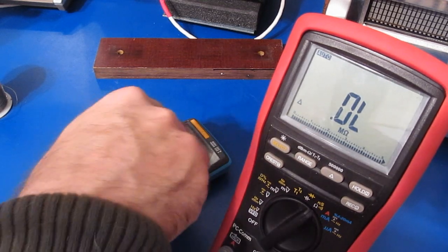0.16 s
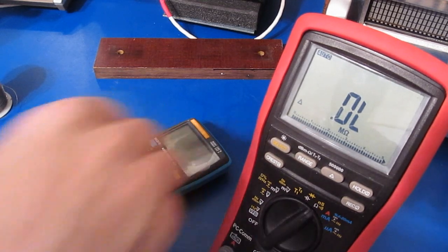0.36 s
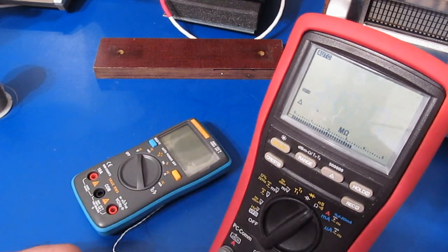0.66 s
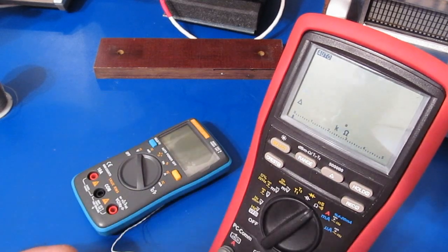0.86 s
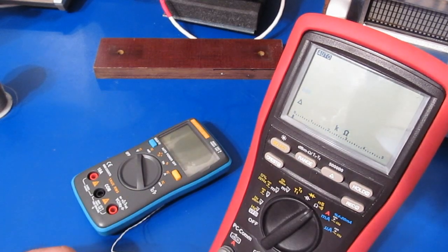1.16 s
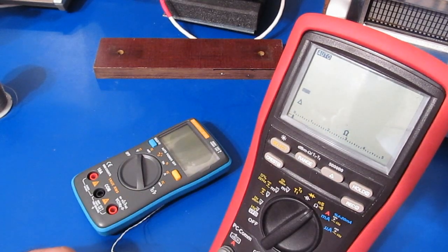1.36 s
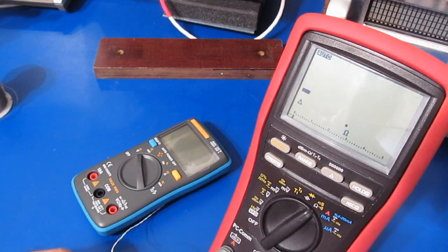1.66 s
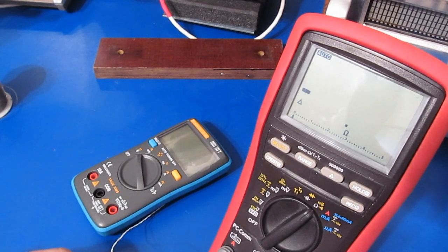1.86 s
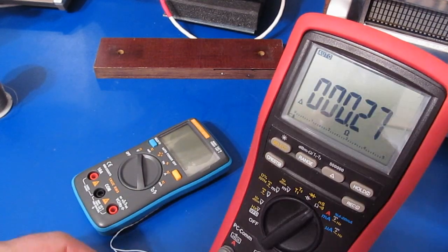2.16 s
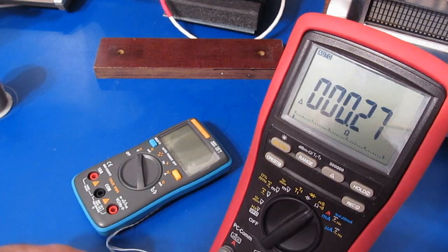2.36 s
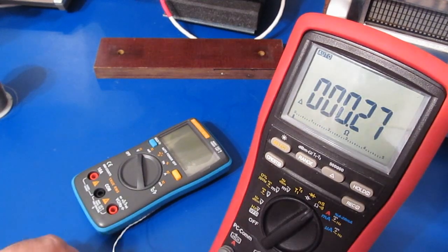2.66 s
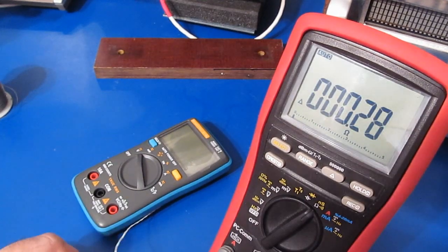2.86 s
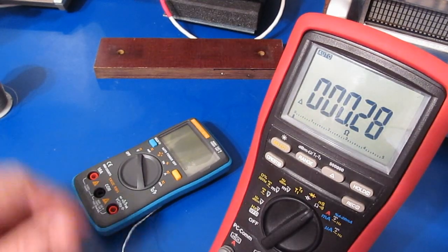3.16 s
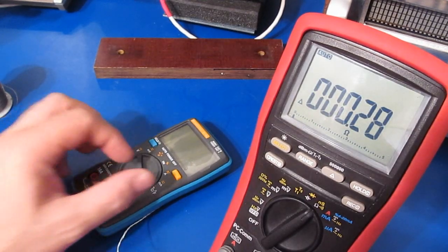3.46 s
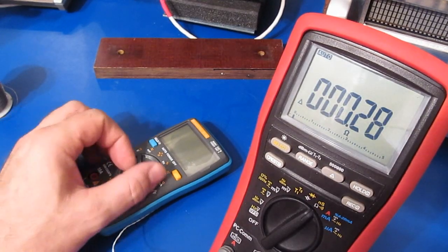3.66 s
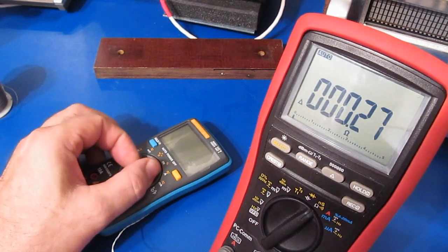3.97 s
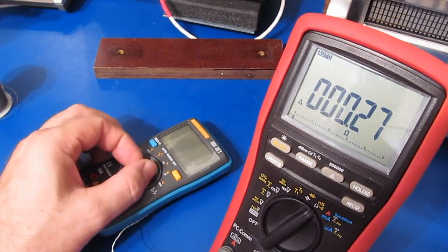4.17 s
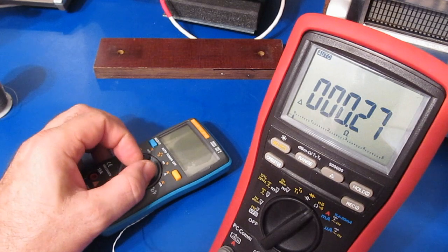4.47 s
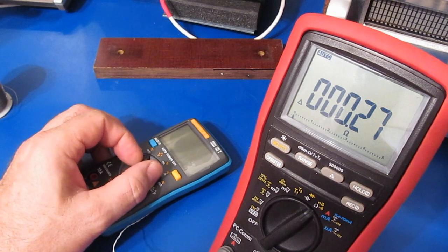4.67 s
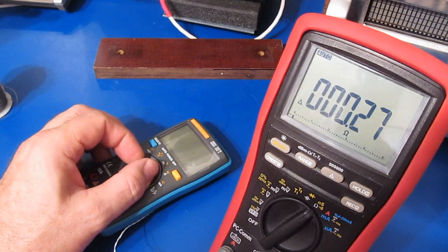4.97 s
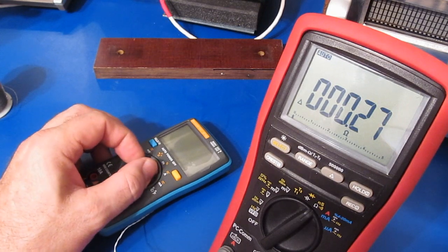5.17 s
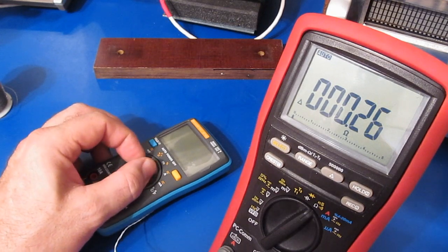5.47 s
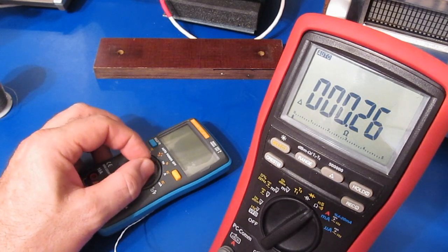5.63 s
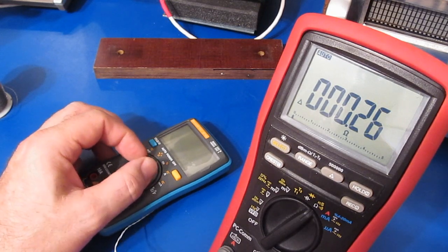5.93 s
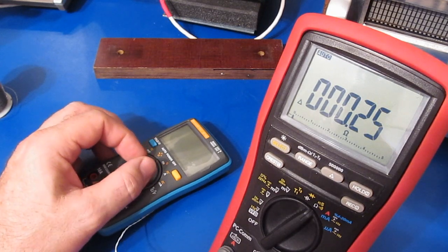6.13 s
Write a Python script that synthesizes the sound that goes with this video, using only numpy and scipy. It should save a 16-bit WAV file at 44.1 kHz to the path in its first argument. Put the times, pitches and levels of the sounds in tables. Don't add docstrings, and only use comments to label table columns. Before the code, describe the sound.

Over a low steady bed of fan air, hum and slight hiss, a small dial clicks with a short rubbing lead-in and rattle. Cloth brushes and faint ticks lead to a busy burst of knocks on the bench. After quieter handling, the dial snaps brightly, rests, then snaps once more. Everything is close and dry, with short bench echoes and a quick small-room tail.

```python
import sys
import numpy as np
from scipy import signal
from scipy.fft import rfft, irfft
from scipy.io import wavfile
from scipy.ndimage import uniform_filter1d

SR = 44100
rng = np.random.default_rng(int(sys.argv[2]) if len(sys.argv) > 2 else 0)


def invert_db(level):
    return 10 ** (np.asarray(level, dtype=float) / 20)


def transcribe(signal):
    frames = np.atleast_2d(signal).T
    limited = np.clip(frames, -1, 1)
    pcm = np.round(limited * 32767).astype(np.int16)
    wavfile.write(sys.argv[1], SR, pcm)


N = 277830
T = np.arange(N) / SR
HZ = np.maximum(np.fft.rfftfreq(N, 1 / SR), 1)


def rms_one(x):
    return x / np.sqrt(np.mean(x ** 2) + 1e-20)


def at_hz(points, hz):
    table = np.array(points)
    return np.interp(np.log(hz), np.log(table[:, 0]), table[:, 1])


def filtered(x, order, hz, kind="low"):
    return signal.sosfilt(signal.butter(order, hz, kind, fs=SR, output="sos"), x)


def ring(force, hz, t60_s):
    radius = invert_db(-60 / (t60_s * SR))
    turn = 2 * np.pi * hz / SR
    return signal.lfilter([0, np.sin(turn)], [1, -2 * radius * np.cos(turn), radius ** 2], force + 1e-18)


def add(out, sound, start_s):
    i = max(round(start_s * SR), 0)
    out[..., i:i + sound.shape[-1]] += sound[..., :N - i]


def grains(spread_db, share, size):
    happens, sign, strength = rng.random((3, size))
    return (happens < share) * np.sign(sign - .5) * invert_db(-spread_db * np.log(1 - strength))


def rattle(t60_s, t, share=.15):
    force = grains(2.5, share, size=len(t)) * invert_db(-60 * t / t60_s)
    force[0] = 4.2
    return force


def swell(t, rise_s, fall_s):
    return np.where(t < 0, np.exp(-.5 * (t / rise_s) ** 2), np.exp(-np.maximum(t, 0) / fall_s))


def coloured(spectrum, likeness):
    mid, side = rfft(rng.standard_normal((2, N))) * invert_db(at_hz(spectrum, HZ))
    mid = mid * np.sqrt(1 + likeness)
    side = side * np.sqrt(1 - likeness)
    return rms_one(irfft([mid + side, mid - side], N))


def off_centre(mono):
    return np.array([mono, np.roll(mono, 2)])


# frequency in Hz, level in dB per Hz.
AIR_SPECTRUM = [(12, -15.5), (26, 3), (42, -8.5), (60, -1), (85, -10.5), (125, -4), (175, -8), (240, -9),
                (330, -14.5), (800, -17.5), (1150, -17), (1900, -22), (4000, -30.5), (9000, -43.5)]
# frequency in Hz, left-right likeness from -1 to 1.
AIR_LIKENESS = [(60, 0.3), (180, 0.81), (550, 0.55), (1650, 0.039), (4970, 0.12), (15000, -0.03)]
AIR_DB = -49.5


def air():
    return invert_db(AIR_DB - 1.0) * coloured(AIR_SPECTRUM, np.clip(at_hz(AIR_LIKENESS, HZ), 0, .99))


# frequency in Hz, level in dB per Hz.
HISS_SPECTRUM = [(1000, -13.5), (4000, 2), (8000, -1), (13000, -15), (14100, -5), (15000, -42),
                 (16000, -42)]
HISS_DB = -67.5


def hiss():
    return invert_db(HISS_DB) * coloured(HISS_SPECTRUM, 0)


# frequency in Hz, level in dB rms.
HUM_TONES = [(59.2, -64.5), (118.4, -62), (236.9, -62.5), (360.7, -70), (419.9, -63.5), (479.1, -68.5),
             (839.8, -71.5), (1200, -72.0), (13916, -96.0), (14040, -97.5), (14277, -88.0)]
# time in seconds, whine in Hz.
FAN_WHINE = [(0, 1240), (1.4, 1237.5), (2.9, 1241), (3.8, 1239.5), (4.5, 1243), (5.3, 1240), (6.3, 1241.5)]
# frequency as a share of the whine, level in dB rms.
FAN_TONES = [(0.7517, -74.5), (.874, -62), (1, -61), (1.373, -74.5)]


def hum():
    whine_cycles = np.cumsum(np.interp(T, *np.transpose(FAN_WHINE))) / SR
    tones = [(hz * T, db) for hz, db in HUM_TONES]
    tones += [(share * whine_cycles, db) for share, db in FAN_TONES]
    knots_s = np.linspace(0, T[-1], 60)
    out = np.zeros((2, N))
    for cycles, db in tones:
        wander, waver = [np.interp(T, knots_s, k) for k in rng.standard_normal((2, 60))]
        phase = 2 * np.pi * cycles + 0.31 * wander + rng.uniform(0, 6.36)
        phase = phase + rng.normal(0, 0.32) * np.array([[1], [-1]])
        out += np.sqrt(2) * invert_db(db + 1.3 * waver) * np.sin(phase)
    return out


# time in seconds, level in dB.
STIR = [(0.0, -68.5), (0.28, -44.5), (0.44, -63), (0.61, -63.5), (0.82, -55.5), (1.04, -61.5), (1.83, -100),
        (2.01, -66), (2.54, -55), (2.62, -74), (2.92, -60), (4.23, -74), (4.4, -82)]
# peak in seconds, level in dB, fall in seconds.
BRUSHES = [(0.125, -46.5, 0.012), (.48, -56, 0.017), (.635, -53.5, 0.062), (.775, -51, 0.03),
           (1.235, -48, 0.026), (1.285, -49.5, 0.029), (1.339, -49, 0.034), (1.408, -49.5, 0.03),
           (2.090, -45.5, 0.028), (2.645, -49.5, 0.024), (3.649, -51, 0.038), (3.78, -51.5, 0.11),
           (3.865, -52, 0.0067), (4.262, -44, 0.026)]
# peak in seconds, level in dB, rise in seconds.
DRAGS = [
    (.76, -57, .019),
    (.89, -57, 0.033),
    (2.225, -58, 0.064),
    (2.608, -45.5, 0.03),
    (3.319, -54.5, 0.024),
]
# frequency in Hz, level in dB per Hz.
CLOTH_SPECTRUM = [(150, 8), (600, 2), (1500, -1.5), (3000, -0.5), (4600, -5), (5500, -2.5), (6000, -8),
                  (6800, -7), (8000, -13.5), (9500, -12), (12000, -21), (15000, -33.5)]
# frequency in Hz, left-right likeness.
CLOTH_LIKENESS = [(500, .85), (2500, .6), (6000, .15), (9000, .05)]
BRUSH_RISE_SHARE, DRAG_STOP_S = 0.21, 0.013


def sleeve():
    level = invert_db(np.interp(T, *np.transpose(STIR), right=-90))
    for s, db, fall_s in BRUSHES:
        level = level + invert_db(db) * swell(T - s, BRUSH_RISE_SHARE * fall_s, fall_s)
    for s, db, rise_s in DRAGS:
        level = level + invert_db(db) * swell(T - s, rise_s, DRAG_STOP_S)
    catch = uniform_filter1d(abs(grains(2.5, .004, size=N)), size=60)
    return coloured(CLOTH_SPECTRUM, at_hz(CLOTH_LIKENESS, HZ)) * level * (1 + .22 * rms_one(catch))


# frequency in Hz, level in dB at the first, second and third detent,
# level in dB when rubbed.
CASE_MODES = [(563, -26.5, -36.5, -31, -15), (734, -19, -13.5, -8, -8), (978, -13, -7.5, -28, -11.5),
              (1319, -8.5, 3.5, -4.5, -6), (1657, -4, -5.5, -13, -5.5), (2082, -7, -10.5, -13, 1),
              (2527, -7, 6, -4, -1), (2815, 5.5, 4, -14, 1.5), (3340, -1, 5.5, -6.5, 0),
              (3930, 4.5, -1, -3, 0.5), (4600, -1, 8, 8, -0.5), (5240, 9.5, 7.5, 9, -0.5),
              (5505, 10, 15, 16, -36), (5896, 8.5, 13, 6.5, -9), (7250, -18, -0.5, -6, -25.5),
              (7140, -17, -1, -15, -57), (7270, 3, 11.5, 8, 3.5), (8630, 11, 18, 10.5, -1),
              (9400, 9.5, 14, 8, -26.5), (10800, 4.5, 5.5, 7, -1), (10260, -35, 3, -20, -24.5),
              (12300, -12, 9.5, -24, -19.5), (14900, -42, -1, -23, -46)]
# frequency in Hz, left minus right in dB.
SHADOW = [(500, -1.5), (2500, -.3), (5000, 1.5), (9000, 4.5)]
CASE_T60_S, DAMPING = .03, 1.2


def case(force, levels_db):
    out = np.zeros((2, len(force)))
    for k, (mode, db) in enumerate(zip(CASE_MODES, levels_db)):
        hz = mode[0]
        sound = ring(force, hz, CASE_T60_S * (1000 / hz) ** DAMPING) * invert_db(db) * (-1) ** k
        pan_db = at_hz(SHADOW, hz) / 2
        lag = 1 + (hz < 5500)
        out += [sound * invert_db(pan_db), np.roll(sound, lag) * invert_db(-pan_db)]
    return out


# peak in seconds, level in dB, fall in seconds,
# brightness in dB per octave.
RUBS = [(.025, -50, 0.021, -7), (0.2124, -31, 0.0056, -1.5), (.2185, -33, .005, 1.5),
        (.245, -44, 0.026, -1), (.272, -38, 0.01, -1.5), (.305, -45, 0.018, -9), (.361, -42, 0.013, -1.5),
        (.768, -45.5, 0.027, -3.5), (3.622, -44.5, 0.0093, -3.5), (3.650, -46, 0.013, -2.2),
        (4.081, -30, 0.009, -2.5), (5.590, -39, 0.0077, -1.3)]
RUB_RISE_SHARE, RUB_LEAD_S = .62, .05


def rubs():
    out, t, modes = np.zeros((2, N)), T[:8000] - RUB_LEAD_S, np.array(CASE_MODES)
    for s, db, fall_s, tilt_db in RUBS:
        slips = grains(2.9, 0.18, size=len(t))
        levels_db = modes[:, 4] + tilt_db * np.log2(modes[:, 0] / 1000)
        steady = np.std(case(slips, levels_db))
        stroke = slips * swell(t, RUB_RISE_SHARE * fall_s, fall_s)
        sound = invert_db(db) / steady * case(stroke, levels_db)
        cut = max(round((RUB_LEAD_S - s) * SR), 0)
        add(out, sound[:, cut:], s - RUB_LEAD_S)
    return out


# start in seconds, level in dB, frequency in
# Hz, t60 in seconds.
PINGS = [(.3585, -23.5, 710, 0.019), (.3585, -32, 3010, 0.02), (0.75, -42.5, 1253, 0.28),
         (.2105, -27, 2720, .03), (.214, -25, 693, .03), (2.435, -41, 2360, 0.089), (2.438, -41, 2560, .09),
         (2.611, -50, 2196, .12), (2.662, -43, 1692, .069), (2.763, -47, 5240, .025),
         (3.314, -49, 5244, .06), (3.313, -49, 7600, .03), (3.618, -38, 720, .04),
         (3.619, -36.5, 1400, 0.038), (3.646, -34, 1370, 0.045), (3.655, -42, 1410, .035),
         (3.098, -52, 5180, .02), (3.197, -50, 5200, .02), (3.844, -39.5, 663, 0.044),
         (3.943, -36.5, 736, 0.025), (3.957, -36, 710, 0.025), (3.986, -44, 720, 0.048),
         (4.022, -36.5, 716, 0.035), (3.785, -46, 1700, 0.056), (4.033, -55.5, 2900, 0.087)]
PING_BUILD_S = .003


def pings():
    out, t = np.zeros(N), T[:6000]
    push = (t < PING_BUILD_S) * 2 / (PING_BUILD_S * SR)
    for s, db, hz, t60_s in PINGS:
        add(out, invert_db(db) * ring(push * np.sin(2 * np.pi * hz * t), hz, t60_s), s)
    return off_centre(out)


# start in seconds, level in dB, rattle t60 in seconds,
# dull knock in dB, sharpness of contact as its upper limit in Hz.
DETENTS = [
    (.2250, -15.5, 0.028, -40, 10500),
    (4.1114, -13, 0.016, -27.5, 15500),
    (5.6457, -17, 0.013, -21, 11300),
]
KNOCK_HZ, KNOCK_T60_S, KNOCK_AHEAD_S = 1370, 0.012, .0025
SPIT_DB, SPIT_HZ, SPIT_T60_S = -9.5, 4000, .012


def detents():
    direct, radiated, t, modes = np.zeros((2, N)), np.zeros((2, N)), T[:4000], np.array(CASE_MODES)
    click = 1. * (t == 0)
    for k, (s, db, rattle_s, knock_db, sharp_hz) in enumerate(DETENTS):
        contact_hz = min(sharp_hz, .45 * SR)
        levels_db = modes[:, 1 + k]
        snap = case(filtered(rattle(rattle_s, t, .2), 4, contact_hz), levels_db)
        snap *= invert_db(db) / np.sqrt(np.mean(snap[:, :130] ** 2))
        spit = grains(2.5, 0.78, size=len(t)) * invert_db(-60 * t / SPIT_T60_S)
        spit = filtered(filtered(spit, 2, SPIT_HZ, "high"), 4, contact_hz)
        spit *= invert_db(db + SPIT_DB) / abs(spit).max()
        add(direct, snap + spit * invert_db([[1.5], [-1.5]]), s)
        even = case(filtered(click, 4, contact_hz), uniform_filter1d(levels_db, size=3))
        add(radiated, rms_one(even) * np.std(snap), s)
        add(direct, invert_db(knock_db) * ring(click, KNOCK_HZ, KNOCK_T60_S), s - KNOCK_AHEAD_S)
    return direct, radiated


# start in seconds, peak in dB, pitch in Hz.
TAPS = [(.2260, -30.5, 584), (0.7484, -27, 1050), (0.752, -35, 2100), (0.767, -34, 2100), (.753, -40, 480),
        (0.861, -43.5, 506), (2.1180, -38, 2520), (2.169, -26, 3450), (2.3531, -22.5, 3620),
        (2.4303, -9.5, 3850), (2.5510, -28, 4570), (2.5748, -27, 3220), (2.592, -35, 1540),
        (2.6050, -46, 5100), (2.6320, -28, 5000), (2.8111, -22, 2120), (2.815, -28.5, 815),
        (2.8133, -24.5, 3820), (2.8230, -32, 2700), (2.9218, -28.5, 2200), (2.9215, -36, 3870),
        (2.9250, -34, 840), (3.191, -33.5, 1490), (3.1915, -42, 3300), (3.3137, -33, 5400),
        (3.7585, -41, 2170), (3.8100, -30.5, 2780), (4.111, -40, 466), (5.644, -48, 450)]
# start in seconds, peak in dB, pitch in Hz.
TICKS = [(2.0620, -43, 3000), (2.4205, -16.5, 3700), (2.4359, -27, 2470), (2.4800, -27, 3040),
         (2.6635, -43, 5030), (2.704, -42, 3800), (2.7190, -44, 1780), (3.108, -40.5, 3040),
         (3.265, -42.5, 2540), (3.618, -41, 4000), (3.871, -36, 1510)]
# frequency as a share of the pitch, level in dB, cycles to die.
TAP_MODES = [(.48, 15.5, 2.38), (.74, 13.5, 4.84), (1, 7.5, 8), (1.37, 3, 8.9), (1.75, 1, 3.9)]
RATTLE_CYCLES, RATTLE_LONGEST_S, TICK_S = 60, 0.16, 0.009
TAP_TOP_HZ, TAP_TOP_SHARE = 6400, 1.67
TAP_FOOT_SHARE = .3


def taps():
    out, t = np.zeros(N), T[:6000]
    touches = [(s, db, hz, min(RATTLE_CYCLES / hz, RATTLE_LONGEST_S)) for s, db, hz in TAPS]
    touches += [(*row, TICK_S) for row in TICKS]
    for s, db, hz, t60_s in touches:
        force = rattle(t60_s, t)
        body = np.zeros(len(t))
        for k, (ratio, mode_db, cycles) in enumerate(TAP_MODES):
            body += invert_db(mode_db) * ring(force, hz * ratio, cycles / hz) * (-1) ** k
        body = filtered(body, 4, max(TAP_TOP_SHARE * hz, TAP_TOP_HZ))
        body = filtered(body, 2, TAP_FOOT_SHARE * hz, "high")
        add(out, invert_db(db) * body / abs(body).max(), s)
    return off_centre(out)


# start in seconds, level in dB.
THUDS = [(0.227, -33.5), (0.747, -64), (.861, -40.5), (2.4205, -26), (2.4365, -35), (2.479, -37),
         (2.5917, -50), (2.719, -44.5), (2.8104, -43), (2.821, -50), (2.9202, -43.5), (3.108, -42),
         (3.192, -43.5), (3.266, -43.5), (3.62, -42), (3.872, -33.5), (4.111, -40.5), (5.643, -43)]
# frequency in Hz, t60 in seconds, level in dB.
BENCH_MODES = [
    (114.8, 0.11, -5.5),
    (194, 0.041, 2.5),
    (296, 0.017, 4),
]


def thuds():
    out = np.zeros(N)
    blow = np.pad(np.hanning(70) / 35, (0, 6000 - 70))
    thud = sum(invert_db(db) * ring(blow, hz, t60_s) for hz, t60_s, db in BENCH_MODES)
    thud = filtered(thud, 2, 95, "high")
    for s, db in THUDS:
        add(out, invert_db(db) * thud, s)
    return off_centre(out)


# start in seconds, peak in dB.
CRACKS = [
    (1.719, -40),
    (1.7245, -36),
    (2.4205, -27),
    (2.4305, -20.5),
    (2.551, -43),
    (2.632, -32),
    (2.8116, -35.5),
    (3.3126, -30.5),
    (3.785, -50),
]
CRACK_S = .018


def cracks():
    out, t = np.zeros(N), T[:6000]
    for s, db in CRACKS:
        crack = filtered(rattle(CRACK_S, t), 3, [6500, 12500], "band")
        add(out, invert_db(db) * crack / abs(crack).max(), s)
    return off_centre(out)


# frequency in Hz, t60 in seconds.
ROOM_T60 = [(300, 0.16), (1500, 0.23), (4000, 0.2), (9000, 0.17), (11500, 0.14), (14000, 0.055)]
ROOM_DB, BENCH_ECHO_DB, BENCH_ECHO_T60_S = -1.5, 3.5, 0.036


def room(x):
    t, edges_hz = T[:SR // 2], 200 * 2 ** np.arange(0, 6.5, .25)
    shared, *own = rng.standard_normal((3, len(t)))
    white = .7 * shared + .7 * np.array(own)
    early = invert_db(BENCH_ECHO_DB - 60 * t / BENCH_ECHO_T60_S) * (t > .0015)
    reply = 0
    for low, high in zip(edges_hz, edges_hz[1:]):
        band = filtered(white, 2, [low, high], "band")
        t60_s = at_hz(ROOM_T60, np.sqrt(low * high))
        late = invert_db(ROOM_DB - 60 * t / t60_s) * (1 - np.exp(-t / 0.004))
        reply = reply + band * (late + early) * 0.039
    return signal.fftconvolve(x, reply, axes=1)[:, :N]


def scene():
    left, right = air() + hum() + sleeve()
    around = np.array([left, np.roll(right, 3)])
    snaps, radiated = detents()
    handling = rubs() + pings() + taps() + thuds() + cracks()
    return snaps + handling + room(radiated + handling) + around + hiss()


def low_pass(x):
    return signal.sosfilt(signal.butter(12, 16640, fs=SR, output="sos"), x)


NOTCH_HZ = [5900, 7880, 11900]
NOTCH_Q, TOP_HZ = 70, 15900


def record(dry):
    notches = [signal.tf2sos(*signal.iirnotch(hz, NOTCH_Q, SR)) for hz in NOTCH_HZ]
    top = signal.cheby2(10, 50, TOP_HZ + 800, fs=SR, output="sos")
    mix = signal.sosfilt(np.vstack(notches + [top]), dry)
    return low_pass(mix)


dry = scene()
out = record(dry)
transcribe(out)
```